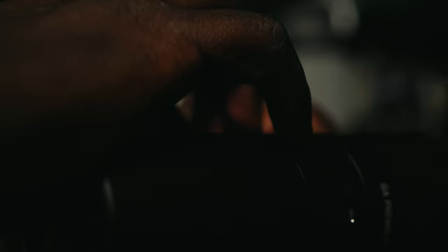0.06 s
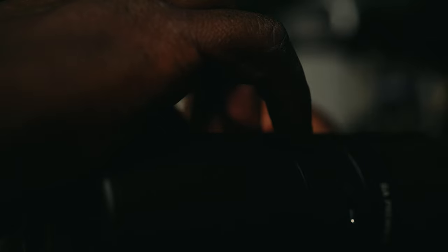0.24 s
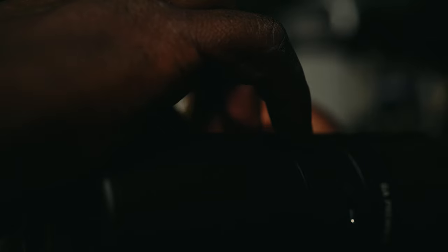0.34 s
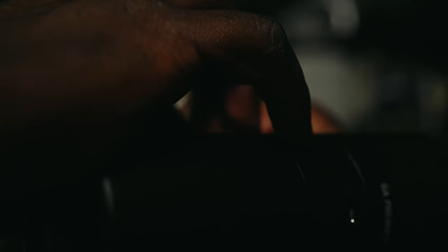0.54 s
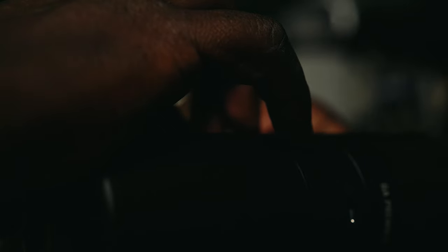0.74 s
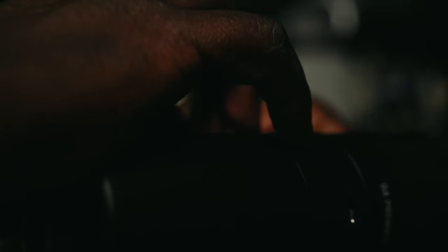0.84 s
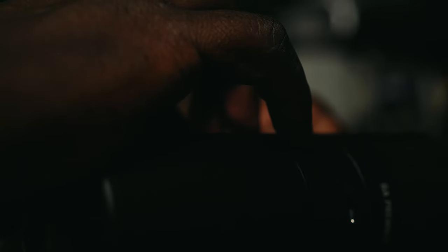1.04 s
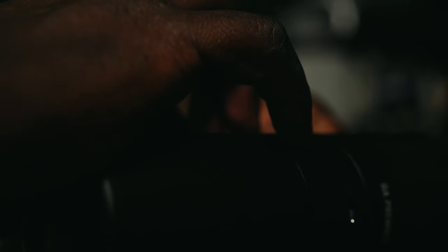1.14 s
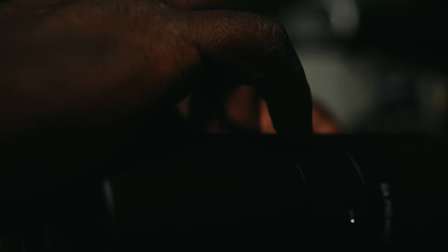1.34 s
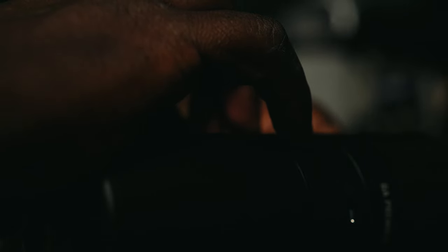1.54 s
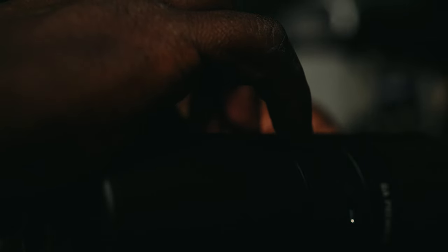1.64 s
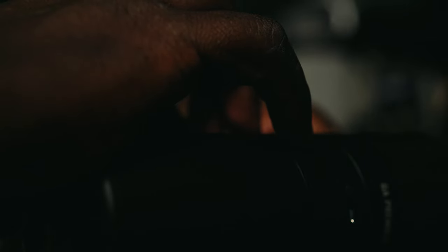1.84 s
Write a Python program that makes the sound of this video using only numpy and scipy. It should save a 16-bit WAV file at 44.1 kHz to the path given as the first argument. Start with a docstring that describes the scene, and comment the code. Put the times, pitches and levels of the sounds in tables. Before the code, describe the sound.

Close metallic clicks come from a camera lens being seated, ending in a clack with a soft low thump. Faint finger rubbing, two tiny ticks and a fingernail tap follow, over steady indoor ventilation and electrical hum.

```python
"""A hand works a catch on a metal cylinder, close up, over ventilation noise, mains hum and a fan tone.
From 0.18 s small bright ticks lead to a sharp snap: metal scrapes home and the sprung catch rings.
At 0.32 s the part seats with a duller clack: the barrel rings, the support thumps, a low boom lingers.
Then the fingers shift their grip: soft rubbing, two faint ticks near 1.15 s,
and a fingernail tap with a dull knock at 1.55 s."""
import sys
import numpy as np
from scipy import signal
from scipy.fft import rfft, irfft
from scipy.io import wavfile
from scipy.ndimage import uniform_filter1d

SR = 44100
rng = np.random.default_rng(int(sys.argv[2]) if len(sys.argv) > 2 else 0)


def wav_out(sig):
    """Save sig, one row per channel (or a flat mono array), as 16-bit PCM at SR to the path in sys.argv[1]."""
    wavfile.write(sys.argv[1], SR, np.round(np.clip(np.atleast_2d(sig).T, -1, 1) * 32767).astype(np.int16))


N = 83790

# Click equaliser frequencies in Hz.
EQ_HZ = [900, 1600, 3000, 6000, 9500, 13500]
# Strikes on catch, barrel and shell. Each row: start, contact build-up and contact decay in seconds,
# then in dB: contact right minus left, ring gain, echo gain, gain at each of EQ_HZ.
CATCH_SNAPS = [(.1838, 0.00059, .002, 5.2, -7, 9, -40, -23, -23, -29, -22.5, -30),
               (.2208, 0.0014, 0.00061, 6, -5.5, -1, -30, -18, -18, -17, -5.5, 0.5),
               (.2424, 0.00065, 0.0017, 4, -5, -2.5, -23, 1, -9.5, -3.5, 0, 8),
               (.2715, 0.00078, 0.0038, 1.6, -3.5, -4.5, -2, 9.5, 12.5, 12.5, 12.5, 8.5),
               (.2818, 0.0021, 0.0024, 1, -10, -0.5, -8, -27, -1, 1, 2, -12),
               (1.1412, 0.0012, .001, 4.9, -4, 2, -43, -36, -30, -40, -26, -29)]
SEATING_CLACKS = [(0.3176, 0.002, 0.0045, 4.5, -4.5, -1.7, 0.67, 11.4, 13.8, 9.4, 5.6, 2.5)]
NAIL_TAPS = [(1.1648, 0.0023, 0.0059, 3.1, -7.5, -0.045, -16, -37, -17.5, -14.5, -9.5, -14),
             (1.5526, 0.00083, 0.0086, 3.7, -9.5, -1.2, -27, -10.5, -9.5, -14.5, -18, -22)]
# Metal modes. Each row: frequency in Hz, relative energy in dB, T60 in seconds before grip damping,
# right minus left in dB.
CATCH_MODES = [(1496, 4, .08, 7), (2083, 4, .07, 7), (2790, 11.5, .04, 0), (3600, 1, .015, 9),
               (4295, 0, .055, 1), (4602, 2, .05, 0), (5124, 4, .06, 9), (6050, 8, .02, 9),
               (6660, 3, .055, 8), (7800, 0, .04, 8), (8240, 6, .025, -8), (9356, 8, .028, 14),
               (12850, 12, .009, 11), (13705, 6, .014, 13)]
BARREL_MODES = [(1421, 3, .12, 5), (1583, 6, .25, 7), (1795, -3, .15, 4), (2110, 7, .14, 8),
                (2630, 4, .07, 5), (3070, 5, .07, -4), (3230, 5, .07, 0), (3860, -2, .05, 7),
                (5090, 10, .03, 8), (5614, 5, .06, 5), (6777, 7, .04, -3), (7434, 5, .06, 7),
                (8451, 3, .06, 5), (9340, 11, .018, 15)]
SHELL_MODES = [(1550, 5, .08, 1), (2090, 3, .06, 3), (3030, 4, .04, -8), (3536, 6, .09, 4),
               (4715, 4, .06, 7), (5550, 3, .07, 2), (5722, 5, .07, 2), (9900, 3, .04, 15),
               (12900, 5, .02, 15)]
# Stereo phase of the modes. Each row: frequency in Hz, left lead in radians.
LEFT_LEAD = [(1000, 0.15), (2000, 1.84), (2900, 1.93), (5000, 1.53), (10000, 0.34)]
# Contact noise balance. Each row: frequency in Hz, added right minus left in dB.
CONTACT_PAN = [(1000, 10), (1900, 7), (3000, -20), (5000, -5), (9000, 5), (13500, 5)]
# Knocks through the support. Each row: start in seconds, initial pitch in Hz, gain in dB, T60 in seconds.
SUPPORT_KNOCKS = [(0.323, 134, -27, 0.11), (1.552, 61.7, -33.5, 0.16)]
# Support modes. Each row: frequency in Hz, gain in dB, swell and T60 in seconds.
SUPPORT_MODES = [(701, -39, 0.0057, 0.075), (939, -20.5, 0.027, 0.084)]
# Low boom. Each row: time in seconds, pitch in Hz, level in dB.
BOOM_TRACK = [(.35, 130, -64), (.39, 150.6, -46), (.47, 150, -47), (.505, 135, -45), (.535, 124, -65)]
# Finger rubs; the narrowest band is the thin, high ring of tiny catch ticks.
# Each row: start and length in seconds, level in dB, centre in Hz, half width in octaves.
FINGER_RUBS = [(0.36, 0.19, -65, 11500, 1), (0.678, 0.23, -59.5, 3360, 0.54),
               (0.841, 0.24, -65.5, 3100, 0.25), (1.109, 0.088, -61.5, 12700, .03),
               (1.557, 0.43, -62.5, 4300, 0.79), (1.707, 0.051, -60, 4530, 0.64)]
# Echoes of desk and room. Each row: frequency in Hz, gain in dB, T60 in seconds.
DESK_ECHOES = [(900, -20, 0.24), (1780, 2.5, 0.16), (3900, -3, 0.07), (7100, -3.5, 0.12), (14000, -11, 0.1)]
ROOM_ECHOES = [(880, 17, 0.26), (2020, -18.5, 0.37), (6000, -20.5, 0.66), (14000, -18, 0.21)]
# Ventilation spectrum. Each row: frequency in Hz, relative density in dB.
AIR_SPECTRUM = [(25, -28), (42, -28), (65, -9.5), (85, -26), (105, -4), (130, -3.5), (200, -3.5), (320, -7),
                (400, -10.5), (520, -7.5), (590, -13), (760, -20.5), (1020, -22.5), (2200, -28),
                (3100, -31.5), (4750, -38.5), (8000, -40.5), (15500, -41.5)]
# Its width. Each row: frequency in Hz, left-right correlation.
AIR_CORRELATION = [(60, 0.98), (130, 0.98), (280, 0.96), (550, 0.69), (1100, 0.36), (3000, 0.022),
                   (12000, 0.022)]
# Its balance. Each row: frequency in Hz, right minus left in dB.
AIR_BALANCE = [(250, 0), (1000, 0.4), (4000, 2), (14000, 2)]
# Its hiss above HISS_HZ. Each row: time in seconds, gain in dB.
HISS_TRACK = [(0, -4), (.2, -1), (.45, 0.5), (1.9, -2)]
# Mains and fan tones. Each row: frequency in Hz, rms level in dB.
HUM_TONES = [(59.6, -57), (119.4, -52.5), (533, -57)]

CONTACT_DB, JOLT_DB, RADIATION_HZ = -4, 5, 1270
MODE_RISE_S, PAIR_SPLIT, GRIP_DAMPING_PER_S = 0.0005, 0.013, 71
REFLECTION_S, REFLECTION_DB, RING_SEND = 0.0058, -20, 0.45
AIR_DB, AIR_FLICKER_DB, HISS_HZ = -42, 0.92, 2460


def click(modes, build_s, decay_s, pan_db, ring_db, echo_db, *eq_db, size=16384):
    """Metal makes contact, the part rings, desk and room echo."""
    t, hz = np.arange(size) / SR, np.fft.rfftfreq(size, 1 / SR)
    contact = contact_noise(build_s, decay_s, pan_db, t, hz)
    ring = amp(ring_db) * metal_ring(modes, (MODE_RISE_S + build_s) / 2, t)
    room = amp(echo_db) * (echoes(DESK_ECHOES, t) + echoes(ROOM_ECHOES, t))
    add(room, REFLECTION_S, amp([REFLECTION_DB]))
    tail = signal.fftconvolve(contact + RING_SEND * ring, room, axes=1)[:, :size]
    eq = amp(lookup(list(zip(EQ_HZ, eq_db)), hz))
    low_cut = 1 / np.hypot(1, 500 / (hz + 1))
    return causal_filter(contact + ring + tail, eq * low_cut)


def contact_noise(build_s, decay_s, pan_db, t, hz):
    """Metal scrapes home in uneven jolts; small parts radiate little bass."""
    jolts = amp(JOLT_DB * np.tanh(unit_rms(uniform_filter1d(rng.standard_normal(len(t)), size=12))))
    force = jolts * np.minimum(t / build_s, 1) ** 2 * np.exp(-np.maximum(t - build_s, 0) / decay_s)
    burst = rng.standard_normal((2, len(t))) * force
    broad_power = uniform_filter1d(abs(rfft(burst)) ** 2, size=301)
    white = causal_filter(burst, 1 / np.sqrt(broad_power + 1e-12))
    radiation = 1 / np.hypot(1, (RADIATION_HZ / (hz + 1)) ** 3)
    return amp(CONTACT_DB) * causal_filter(white * pan(pan_db), radiation * pan(lookup(CONTACT_PAN, hz)))


def metal_ring(modes, rise_s, t):
    """Slightly uneven metal rings in close mode pairs, damped by the hand."""
    ring = np.zeros((2, len(t)))
    for hz, db, t60_s, pan_db in modes:
        phase = 2 * np.pi * rng.random() + np.array([[lookup(LEFT_LEAD, hz)], [0]])
        twin_hz = hz * (1 + PAIR_SPLIT * rng.choice([-1, 1]) * rng.uniform(1, 1.54))
        pair = np.sin(2 * np.pi * hz * t + phase) + .5 * np.cos(2 * np.pi * twin_hz * t + phase)
        ring += amp(db) * pan(pan_db) * unit_rms(pair * decay(t, t60_s) * np.exp(-GRIP_DAMPING_PER_S * t))
    return unit_rms(ring * swell(t, rise_s)) / np.sqrt(len(t))


def support_ring():
    """Shaken by the clack, the support's modes swell and die away."""
    t = np.arange(SR) / SR
    return sum(amp(db) * np.sin(2 * np.pi * (hz * t + rng.random())) * swell(t, rise_s) * decay(t, t60_s)
               for hz, db, rise_s, t60_s in SUPPORT_MODES)


def knock(hz, db, t60_s, rise_s=0.005, sag_share=0.16, sag_s=0.025):
    """A dull thump; pitch sags as the pressure lets go."""
    t = np.arange(SR) / SR
    cycles = np.cumsum(hz * (1 - sag_share * (1 - np.exp(-t / sag_s)))) / SR
    return amp(db) * np.sin(2 * np.pi * cycles) * (1 - np.exp(-t / rise_s)) * decay(t, t60_s)


def boom():
    """A low note after the clack, rising a little, then sinking."""
    t = np.arange(N) / SR
    times_s, hz, db = np.transpose(BOOM_TRACK)
    level = amp(np.interp(t, times_s, db)) * (t > times_s[0]) * (t < times_s[-1])
    return level * np.sin(2 * np.pi * np.cumsum(np.interp(t, times_s, hz)) / SR)


def finger_rub(length_s, db, centre_hz, half_width_oct, grain_db=3, pan_db=4.5):
    """Skin slides over the barrel in a swell of tiny slips; a very narrow band gives a thin ring."""
    n = int(length_s * SR)
    slips = rng.standard_normal((2, n)) * amp(grain_db * np.minimum(rng.exponential(1, n), 5))
    octaves = np.log2((np.fft.rfftfreq(n, 1 / SR) + 1) / centre_hz)
    band = irfft(rfft(slips) / (1 + (octaves / half_width_oct) ** 2), n)
    return amp(db) * pan(pan_db) * unit_rms(band) * np.sin(np.pi * np.arange(n) / n)


def echoes(table, t):
    """Diffuse reflections; each band has its own level and decay."""
    hz, frame_s, bands = signal.stft(rng.standard_normal((2, len(t))), SR, nperseg=128)
    t60_s = np.maximum(lookup(table, hz, column=2), .005)[:, None]
    bands *= amp(lookup(table, hz)[:, None] - 60 * frame_s / t60_s)
    bands *= np.sqrt(np.log(1e6) / t60_s / SR)  # energy independent of T60
    return signal.istft(bands, SR, nperseg=128)[1][:, :len(t)] * swell(t, rise_s=.004)


def ventilation(size=2048):
    """Moving air: near-mono rumble, wide hiss."""
    hz, frames = np.fft.rfftfreq(size, 1 / SR), 4 * N // size + 5
    a, b, c, d, flicker = rng.standard_normal((5, frames, len(hz)))
    correlation = lookup(AIR_CORRELATION, hz)
    left = a + 1j * b
    right = correlation * left + np.sqrt(1 - correlation ** 2) * (c + 1j * d)
    bands = np.array([left, right]) * pan(lookup(AIR_BALANCE, hz))[:, None]
    flicker = unit_rms(uniform_filter1d(uniform_filter1d(flicker, size=8, axis=0), size=10, axis=1))
    bands *= amp(lookup(AIR_SPECTRUM, hz) + AIR_FLICKER_DB * flicker)
    hiss_db = np.interp(np.arange(frames) * size / 4 / SR, *np.transpose(HISS_TRACK))
    bands *= amp(hiss_db[:, None] * hz / np.hypot(hz, HISS_HZ))
    air = signal.istft(bands.transpose(0, 2, 1), nperseg=size, noverlap=size * 3 // 4)[1]
    return amp(AIR_DB) * unit_rms(air[:, :N])


def hum():
    """Mains hum and a fan tone, each wavering in phase."""
    t, tones = np.arange(N) / SR, np.zeros(N)
    waver_hz = np.geomspace(.5, 9, 12)
    for hz, db in HUM_TONES:
        waver = unit_rms(sum(np.sin(2 * np.pi * (f * t + rng.random())) / np.sqrt(f) for f in waver_hz))
        tones += amp(db) * np.sqrt(2) * np.sin(2 * np.pi * hz * t + np.sqrt(hz / 120) * waver)
    return tones


def amp(db):
    return 10 ** (np.asarray(db) / 20)


def unit_rms(x):
    return x / np.sqrt(np.mean(x ** 2) + 1e-20)


def swell(t, rise_s):
    return 1 - np.exp(-(t / rise_s) ** 2)


def decay(t, t60_s):
    return np.exp(-np.log(1000) * t / t60_s)


def lookup(rows, hz, column=1):
    """Interpolates a column over log frequency."""
    table = np.array(rows, float)
    return np.interp(np.log(hz + 1), np.log(table[:, 0] + 1), table[:, column])


def pan(db):
    """Constant-power stereo gains from right minus left in dB."""
    gains = amp([-np.atleast_1d(db) / 2, np.atleast_1d(db) / 2])
    return gains / np.sqrt((gains ** 2).mean(0))


def add(mix, start_s, sound):
    part = mix[:, max(round(start_s * SR), 0):][:, :sound.shape[-1]]
    part += sound[..., :part.shape[-1]]


def causal_filter(x, gain):
    """Minimum-phase filter, one gain per FFT bin."""
    log_gain = np.log(np.maximum(gain, 1e-5))
    mirrored = np.concatenate([log_gain, log_gain[..., -2:0:-1]], -1)
    return irfft(rfft(x) * np.exp(signal.hilbert(mirrored).conj())[..., :log_gain.shape[-1]])


def scene():
    """Clicks, knocks and rubs over room tone."""
    mix = ventilation() + hum() + boom()
    for strikes, modes in ((CATCH_SNAPS, CATCH_MODES), (SEATING_CLACKS, BARREL_MODES),
                           (NAIL_TAPS, SHELL_MODES)):
        for start_s, *row in strikes:
            add(mix, start_s, click(modes, *row))
    for start_s, *_ in SEATING_CLACKS:
        add(mix, start_s, support_ring())
    for start_s, *row in SUPPORT_KNOCKS:
        add(mix, start_s, knock(*row))
    for start_s, *row in FINGER_RUBS:
        add(mix, start_s, finger_rub(*row))
    return mix


def record(dry):
    """Low-pass at 15.75 kHz."""
    low_pass = signal.firwin(255, 15750, window=("kaiser", 9), fs=SR)
    return signal.oaconvolve(dry, low_pass[None], "same")


dry = scene()
out = record(dry)
wav_out(out)
```